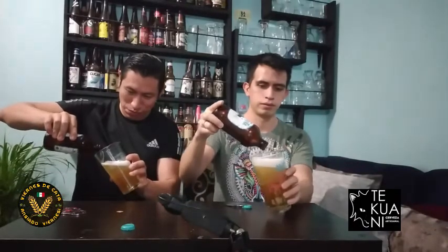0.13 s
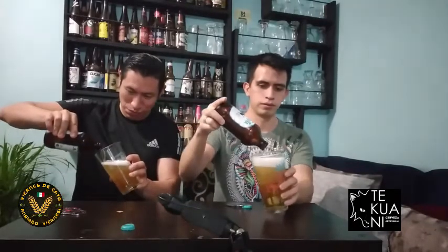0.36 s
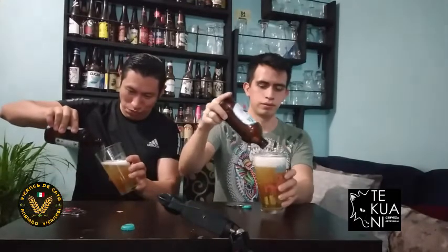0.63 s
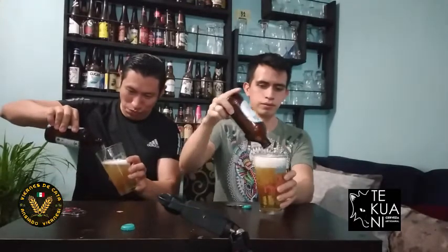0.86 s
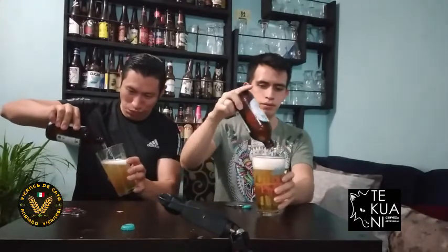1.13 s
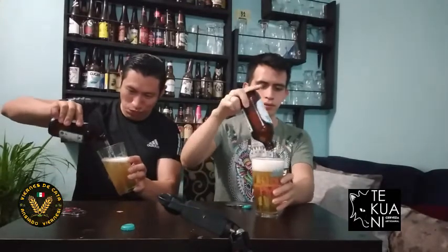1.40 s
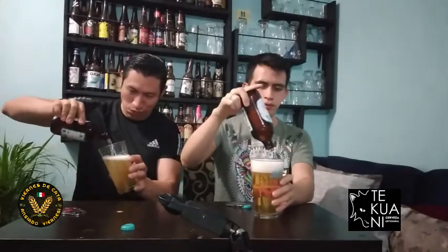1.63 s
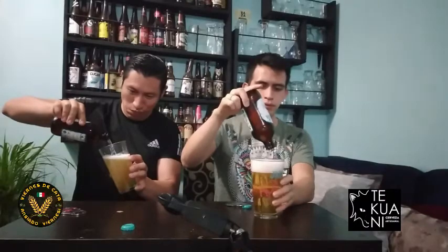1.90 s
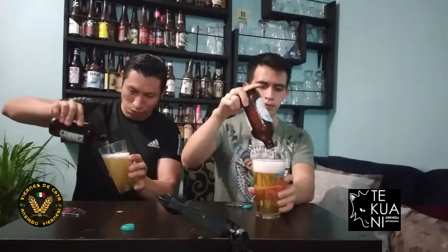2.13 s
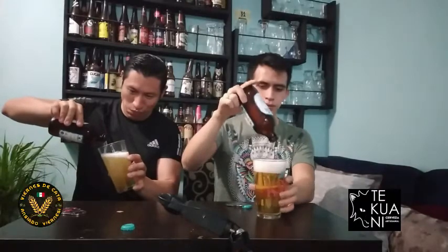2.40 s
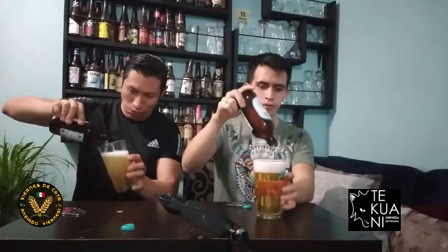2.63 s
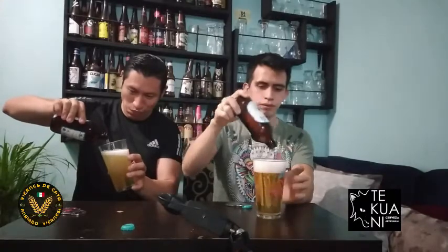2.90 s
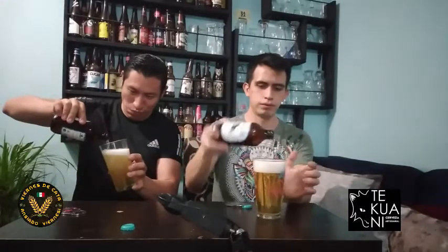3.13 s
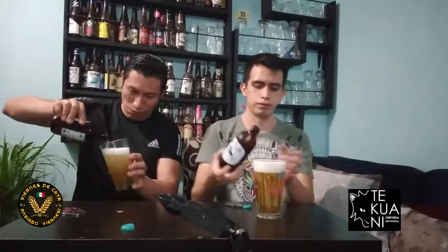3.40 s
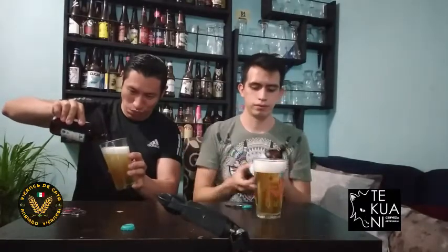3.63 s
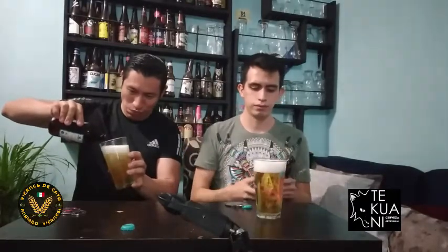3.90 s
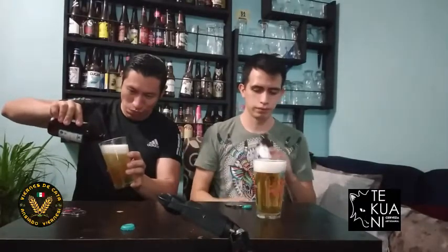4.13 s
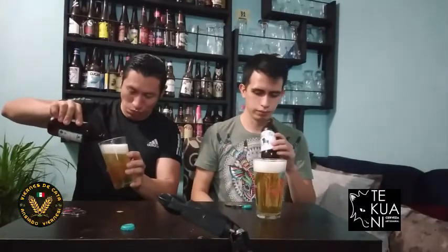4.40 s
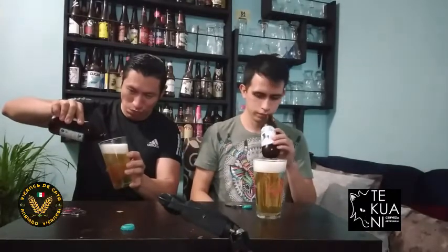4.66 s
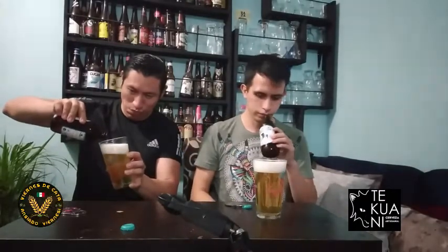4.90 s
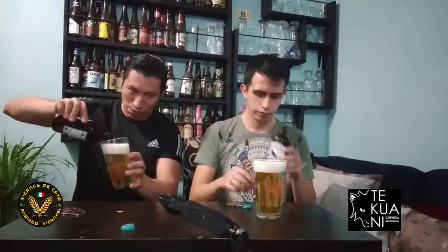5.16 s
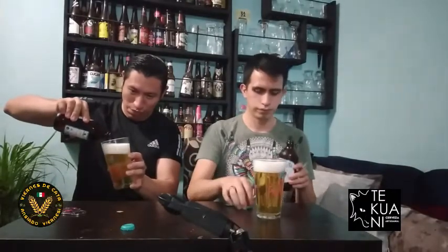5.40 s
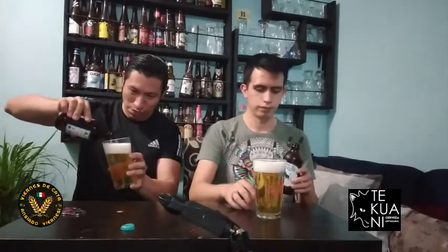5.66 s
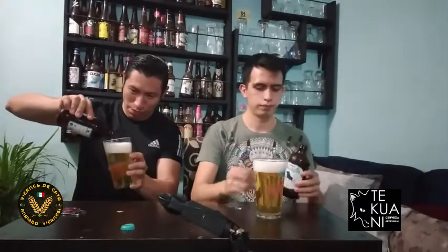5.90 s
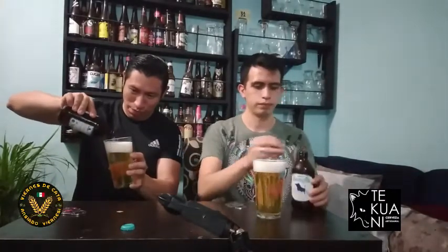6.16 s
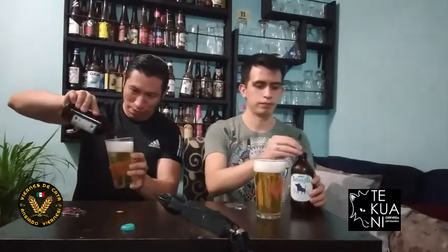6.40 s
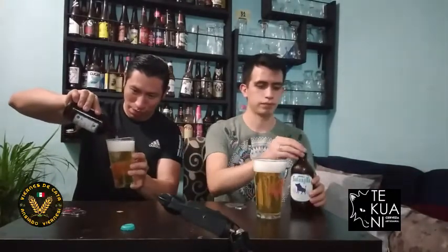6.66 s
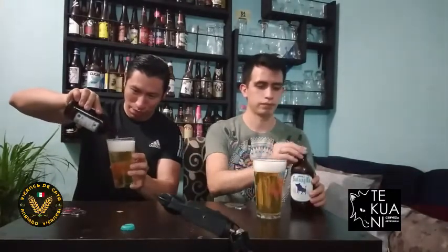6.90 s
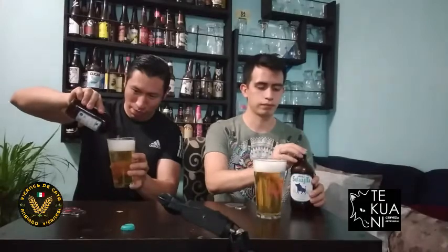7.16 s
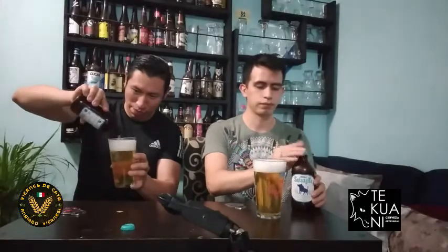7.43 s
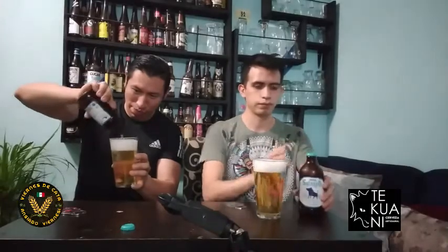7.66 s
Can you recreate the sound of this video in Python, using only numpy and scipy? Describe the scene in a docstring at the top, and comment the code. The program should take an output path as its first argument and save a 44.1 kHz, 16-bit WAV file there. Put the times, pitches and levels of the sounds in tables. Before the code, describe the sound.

Cooler hum and faint fading beer fizz over distant engine rumble, then bottles and glasses rub and knock on a wooden table with one loud clack.

```python
"""A small hard room, a microphone near a wooden table: a cooler hums, beer foam fizzes and fades away,
and far engines surge and rumble in the bass. Bottles are then rubbed, knocked and clinked, with small ticks;
something hard drops on the table with a loud clack, and more sliding, knocking and bottle ringing follow.
Noise makes hiss and rubs, struck decaying modes make wood and glass, sweeping sines make engines;
the microphone's noise suppressor lets the treble through only while something rises over the room."""
import sys
import numpy as np
from scipy import signal
from scipy.fft import rfft, irfft, next_fast_len
from scipy.io import wavfile
from scipy.ndimage import uniform_filter1d, minimum_filter1d

SR = 44100
rng = np.random.default_rng(int(sys.argv[2]) if len(sys.argv) > 2 else 0)


def bounce(signal):
    """Save signal as a 16-bit WAV file at the path given by the first command-line argument."""
    frames = np.transpose(np.atleast_2d(signal))
    limited = np.clip(frames, -1, 1)
    pcm = np.round(limited * 32767).astype(np.int16)
    wavfile.write(sys.argv[1], SR, pcm)


def voltage_ratio(decibels):
    """Convert decibels (scalar or array-like) to amplitude ratios, 20 dB per decade."""
    exponent = np.asarray(decibels, float) / 20
    return 10 ** exponent


N = 343646  # samples

# ringing modes of the wooden table top: mode_hz, level_db (relative), t60_s
TABLE_MODES = [(121, -9, 0.064), (195.2, -2.5, 0.1), (260, -6, 0.12), (303, -5, 0.29), (375, 3.5, 0.092),
               (430, 0.5, 0.16), (483.6, 2.5, 0.062), (541, -2.5, 0.08), (620, -3.5, 0.07),
               (730.7, -5, 0.22), (836, 0.5, 0.038), (990, 0.5, 0.037), (1107, -4.5, 0.057),
               (1490, 6.5, 0.0057)]


def rms_one(x):
    """Scale to rms 1."""
    return x / np.sqrt(np.mean(x ** 2) + 1e-20)


def at_hz(points, hz, axis=1):
    """Read a column of a table on a log-frequency axis."""
    points = np.array(points)
    return np.interp(np.log(hz + 1e-3), np.log(points[:, 0]), points[:, axis])


def in_time(rows):
    """Read a curve at every sample."""
    rows = np.array(rows)
    return np.interp(np.arange(N) / SR, rows[:, 0], rows[:, 1])


def shaped(x, gain):
    """Multiply the spectrum by gain(Hz)."""
    size = next_fast_len(x.shape[-1])
    hz = np.arange(size // 2 + 1) * SR / size
    return irfft(rfft(x, size) * gain(hz), size)[..., :x.shape[-1]]


def ring(clicks, hz, t60):
    """A two-pole resonator: a unit click sets a decaying sine of height 1 ringing."""
    radius = voltage_ratio(-60 / (t60 * SR))
    angle = 2 * np.pi * hz / SR
    return signal.lfilter([0, np.sin(angle)], [1, -2 * radius * np.cos(angle), radius ** 2], clicks + 1e-18)


def strike(times, level_db, modes, spread_db, colour_db=lambda hz: 0, reversed_share=0):
    """Every blow strikes every mode with a strength of its own; some modes start in the opposite direction."""
    at = np.round(np.asarray(times) * SR).astype(int)
    chance = rng.standard_normal((len(times), len(modes)))
    sign = np.where(rng.random(chance.shape) < reversed_share, -1, 1)
    out = np.zeros(N)
    for k, (hz, mode_db, t60) in enumerate(modes):
        strength_db = level_db + mode_db + colour_db(hz) + spread_db * chance[:, k]
        clicks = np.zeros(N)
        clicks[at] = sign[:, k] * voltage_ratio(strength_db)
        out += ring(clicks, hz, t60)
    return out


def snaps(times, level_db, t60):
    """Bursts of impulses with random signs, whose size decays smoothly from each start."""
    clicks = np.zeros(N)
    clicks[np.round(np.asarray(times) * SR).astype(int)] = voltage_ratio(level_db)
    decay = signal.lfilter([1], [1, -voltage_ratio(-60 / (t60 * SR))], clicks + 1e-18)
    return decay * rng.choice([-1, 1], N)


def ramps(start, length, attack, release):
    """0 to 1 after the start, back to 0 after the end (all in seconds)."""
    t = np.arange(N) / SR - start
    return np.clip(np.minimum(t / attack, 1 + (length - t) / release), 0, 1)


def stereo_noise(gain):
    """Coloured noise, most alike between the channels in the bass; the right one hears it a little later."""
    # sharing between the channels before the delay: frequency_hz, likeness (0 to 1)
    likeness = [(60, 0.75), (180, 1), (550, 0.12), (1650, 0.22), (4970, 0.23), (15000, 0.05)]

    def alike(hz):
        return np.clip(at_hz(likeness, hz), 0, 1)

    mid, side = rng.standard_normal((2, N))
    mid = shaped(mid, lambda hz: gain(hz) * np.sqrt((1 + alike(hz)) / 2))
    side = shaped(side, lambda hz: gain(hz) * np.sqrt((1 - alike(hz)) / 2))
    return np.array([mid + side, np.roll(mid - side, shift=20)])  # delay in samples


def traffic():
    """Far engine tones climb, swell and break off; a deep noise rumble swells with each heavy vehicle."""
    # engines pulling away: start_s, length_s, start_pitch_hz, end_level_db (rms)
    surges = [(0, 1.05, 57.7, -29), (1.191, 0.19, 63.3, -36.5), (1.811, 0.13, 67.8, -36),
              (2.023, 0.24, 63.2, -29), (2.602, 0.19, 86.1, -42), (2.992, 0.32, 80.9, -35),
              (3.391, 0.3, 83.4, -35), (3.845, 0.21, 88.1, -35.5), (4.143, 0.29, 86, -44.5)]
    # heavy vehicles: closest_pass_s, level_db (rms, added to the rumble at rest)
    passes = [(0, -31), (5.401, -48), (6.721, -33.5)]
    rest_db, rise_db_per_s, fall_db_per_s = -46, 60, 17.5
    climb_hz_per_s, swell_db_per_s = 7.5, 8.5
    attack_s, release_s = 0.038, 0.05

    t = np.arange(N) / SR
    level = voltage_ratio(rest_db)
    for pass_s, pass_db in passes:
        away_db = np.where(t < pass_s, rise_db_per_s * (pass_s - t), fall_db_per_s * (t - pass_s))
        level = level + voltage_ratio(pass_db - away_db)
    out = rms_one(stereo_noise(lambda hz: np.exp(-((hz - 30) / 9) ** 2))) * level

    for (start, length, hz, db), turn in zip(surges, rng.random(len(surges))):
        since = np.clip(t - start, -1, 2)
        tone = np.sin(2 * np.pi * (turn + hz * since + .5 * climb_hz_per_s * since ** 2))
        swell = voltage_ratio(db - swell_db_per_s * (length - since))
        # a surge at time zero is already under way
        gate = ramps(start, length, attack_s * (start > 0) + 1e-6, release_s)
        out += np.sqrt(2) * swell * gate * tone
    return out


def room_noise():
    """Broad air noise plus narrow noise bands where room modes hum."""
    # air noise ahead of the suppressor: frequency_hz, level_db (per third octave)
    air = [(20, -56), (40, -49.5), (100, -47.5), (200, -57), (320, -52), (450, -56.5), (650, -55.5),
           (900, -59), (1400, -67.5), (2500, -66), (4000, -68), (7000, -74), (12000, -82.5), (16000, -91)]
    # room modes excited by the cooler: centre_hz, width_hz, level_db (rms)
    hum = [(135.9, 11, -48), (174.2, 12, -46), (193.45, 5.2, -47), (243.9, 13, -43), (286.7, 11, -53),
           (324, 13, -59.5), (402, 18, -56)]
    third = 2 ** (1 / 6) - 2 ** (-1 / 6)  # third-octave width as a share of its centre

    def gain(hz):
        power = voltage_ratio(2 * at_hz(air, hz)) / (third * (hz + 1))
        for centre_hz, width_hz, level_db in hum:
            bell = np.exp(-.5 * ((hz - centre_hz) * 2 / width_hz) ** 2)
            power += voltage_ratio(2 * level_db) * bell / (width_hz * np.sqrt(np.pi / 2))
        return np.sqrt(power * SR / 2) * (hz > 12)

    return stereo_noise(gain)


def cooler():
    """The steady whine of the cooler's motor: a thin sine whose pitch wavers slowly and slightly."""
    pitch_hz, waver_hz, level_db = 414, 1.194, -50.5  # waver and level are rms
    waver = rms_one(shaped(rng.standard_normal(N), lambda hz: hz < 3))
    phase = 2 * np.pi * np.cumsum(pitch_hz + waver_hz * waver) / SR
    return np.sqrt(2) * voltage_ratio(level_db) * np.sin(phase)


def fizz():
    """Tiny foam bubbles burst in the glasses: bright noise of uneven grain, independent in each channel."""
    # fading of the foam: time_s, level_db (rms)
    foam = [(0, -62), (.4, -62.5), (1, -77), (4, -85.5)]
    bursts = rng.standard_normal((2, N)) * voltage_ratio(4.4 * rng.standard_normal((2, N)))
    band = signal.butter(1, [1300, 8000], "band", fs=SR, output="sos")
    return rms_one(signal.sosfilt(band, bursts)) * voltage_ratio(in_time(foam))


def stroke(start, length, db, change_db):
    """Pressure of one stroke: quick start, steady change in dB per s, quick stop, faint dying rustle."""
    attack_s, release_s = 0.0041, 0.0067
    settle_db, settle_db_per_s = -15, -93
    since = np.clip(np.arange(N) / SR - start, 0, None)
    moving = ramps(start, length, attack_s, release_s) * voltage_ratio(db + change_db * np.minimum(since, length))
    end_db = db + change_db * length
    settling = voltage_ratio(end_db + settle_db + settle_db_per_s * (since - length)) * (since > length)
    return np.maximum(moving, settling)


def rubs():
    """Dense tiny catches between two sliding surfaces come in clumps, coloured by what they shake."""
    # strokes grouped by the colour of the rub: start_s, length_s, start_level_db (rms), change_db_per_s
    strokes_by_colour = [
        [(1.594, 0.08, -48.5, -28), (6.848, 0.016, -49, -100)],
        [(5.423, 0.062, -47, 41), (5.476, 0.081, -42.5, -95), (5.545, 0.31, -47, -16),
         (5.615, 0.057, -46.5, 12)],
        [(1.672, 0.058, -49.5, -39), (6.203, 0.061, -34, -54), (6.25, 0.11, -32, -110),
         (6.388, 0.078, -48, -49)],
        [(6.953, 0.07, -46.5, -60)],
        [(7.058, 0.13, -38.5, -86)],
        [(7.47, 0.061, -55.5, 55), (7.525, 0.093, -47.5, 62), (7.605, 0.21, -36, -16.5)],
        [(5.481, 0.093, -47.5, -29.5)],
    ]
    # the colour of each group in the same order: frequency_hz, level_db (per Hz, relative)
    colours = [
        [(470, -42), (800, -11.5), (992, -12), (1460, -14), (3620, -17.5), (14000, -47.5)],
        [(470, -34.5), (760, -5.5), (1160, -10.5), (2160, -14.5), (3570, -9.5), (4880, -23.5), (8500, -28.5),
         (14000, -42)],
        [(470, -32), (800, 0), (1350, -18.5), (2590, -12.5), (3290, -26.5), (11200, -40.5), (14000, -67)],
        [(470, -39), (800, -10), (981, -14.5), (2500, -13), (5570, -32), (7420, -13), (8470, -26), (11200, -26),
         (14000, -39)],
        [(470, -31), (800, -10.5), (1720, -11), (1990, -15), (3750, -15), (5370, -20.5), (7510, -14.5),
         (14000, -31)],
        [(470, -28), (800, -5), (902, -20), (1160, -1), (1560, -7.5), (2210, -5.5), (3170, -18), (11200, -30),
         (14000, -47)],
        [(2500, -22.5), (3500, -1), (4600, -21), (7900, -42.5), (8600, -8), (9500, -43.5)],
    ]
    out = np.zeros((2, N))
    clumps = rms_one(shaped(rng.standard_normal(N), lambda hz: (hz > 20) & (hz < 150)))
    for strokes, colour in zip(strokes_by_colour, colours):
        unevenness_db = 3.1 * rng.standard_normal(N) + 1.8 * clumps
        catches = rng.standard_normal((3, N)) * voltage_ratio(unevenness_db)
        sides = .6 * catches[0] + .8 * catches[1:]  # partly shared by left and right
        coloured = rms_one(shaped(sides, lambda hz: voltage_ratio(at_hz(colour, hz))))
        out += coloured * np.max([stroke(*row) for row in strokes], axis=0)
    return out


def knocks():
    """The table top rings dully after a contact of about a millisecond, strongest near the pitch of the spot."""
    # glass touching the table: start_s, level_db (relative), spot_pitch_hz (favoured by the spot)
    touches = [(1.6, -13, 206), (1.63, -19.5, 283), (1.657, -20, 240), (5.428, -20.5, 346.6),
               (5.487, -24, 487), (5.548, -27, 279.5), (6.206, -10, 460), (6.257, -13, 379),
               (6.292, -17, 375), (6.393, -15.5, 430), (6.849, -28.5, 500), (6.966, -24, 300),
               (7.064, -13, 385), (7.154, -25.5, 417), (7.486, -26, 365), (7.525, -22, 430),
               (7.564, -19.5, 515), (7.609, -14.5, 396), (7.62, -17, 420), (7.64, -21, 430),
               (7.672, -16.5, 450), (7.696, -16, 470), (7.744, -20, 423)]
    bounce_s, bounce_loss_db, bounce_pitch = 0.025, 7.5, 0.63  # typical delay, loss, pitch ratio
    knock_tilt_db, bounce_tilt_db = 7, -2  # per octave
    s, level_db, spot_hz = np.transpose(touches)
    tilt_db = np.repeat([knock_tilt_db, bounce_tilt_db], len(s))

    # each knock lands once more, softer and lower
    s = np.append(s, s + bounce_s * voltage_ratio(1.5 * rng.standard_normal(len(s))))
    level_db = np.append(level_db, level_db - bounce_loss_db)
    spot_hz = np.append(spot_hz, spot_hz * bounce_pitch)

    def colour_db(hz):
        octaves = np.log2(hz / spot_hz)
        return tilt_db * octaves - 16.5 * np.abs(octaves)

    wood = strike(s, level_db - 7.5, TABLE_MODES, spread_db=2.5, colour_db=colour_db, reversed_share=.5)
    contact = np.hanning(round(0.00078 * SR))  # contact length in s
    snap = signal.lfilter([.4], [1, -.6], snaps(s, level_db - 37.5, t60=0.0098))
    return signal.lfilter(contact / contact.sum(), [1], wood) + snap


def clinks_and_ticks():
    """Glass on glass rings faintly in decaying modes; ticks and rustles are tiny snaps around one pitch."""
    # glass on glass: start_s, level_db (relative)
    touches = [(3.541, -47), (3.555, -46)]
    # ringing modes of the glass: mode_hz, level_db (relative), t60_s
    glass = [(3350, -10, 0.047), (3742, -0.5, 0.045), (4776, -9.5, 0.04), (8110, -8.5, 0.032),
             (10290, -12, 0.048)]
    # small ticks and rustles: start_s, level_db (before band-pass), pitch_hz, t60_s
    ticks = [(2.543, -46.5, 4800, 0.15), (3.255, -38.5, 8500, 0.031), (7.061, -37.5, 5990, .03),
             (7.606, -32, 7500, .025)]
    s, level_db = np.transpose(touches)
    out = strike(s, level_db, glass, spread_db=1.5)
    for s, level_db, hz, t60 in ticks:
        band = signal.butter(1, [hz / 0.89, hz * 1.2], "band", fs=SR, output="sos")
        out += signal.sosfilt(band, snaps([s], level_db, t60))
    return out


def clacks(which):
    """Push-and-pull pulses with the colour of the dropped hard thing, and the table ringing under them."""
    # spectrum of the hard thing: frequency_hz, level_db (per Hz, relative)
    hard_thing = [(150, -44.5), (300, -18), (440, -10), (579, -4.5), (664, 0.5), (800, -14), (3000, -11.5),
                  (4840, -19), (7000, -16), (11500, -20.5), (15000, -35)]
    s, level_db = np.transpose(which)
    clicks = np.zeros(N)
    clicks[np.round(s * SR).astype(int)] = voltage_ratio(level_db + 24.5)
    # a quarter turn of phase makes each pulse push, then pull
    crack = shaped(clicks, lambda hz: -1j * voltage_ratio(at_hz(hard_thing, hz)))
    begun = np.arange(N) > (s[0] - .0004) * SR
    table = strike(s, level_db - 26.5, TABLE_MODES, spread_db=6.0,
                   colour_db=lambda hz: -7.0 * np.abs(np.log2(hz / 450)))
    return crack * begun + table


def bottle():
    """The bottle wall rings in decaying modes as it is dragged and set down."""
    # contacts of the bottle: start_s, level_db (relative)
    bumps = [(6.252, -37.5), (7.58, -37), (7.608, -24.5), (7.669, -44.5)]
    # ringing modes of its wall: mode_hz, level_db (relative), t60_s
    wall = [(1147, 1, 0.11), (1840, -19, 0.074), (2156, -14.5, 0.11), (2490, -9, 0.062)]
    s, level_db = np.transpose(bumps)
    return strike(s, level_db, wall, spread_db=3.0)


def room(x):
    """Dense echoes: octave bands of noise die at their own rates, less alike in both channels in the treble."""
    # dying of the echoes: frequency_hz, t60_s
    reverb_t60 = [(200, 0.36), (1000, 0.38), (4000, 0.4), (12000, 0.29)]
    t, echo = np.arange(SR // 2) / SR, 0
    for hz in 125 * 2. ** np.arange(8):
        band = signal.butter(2, [hz / 1.42, min(hz * 1.42, 20000)], "band", fs=SR, output="sos")
        decay = voltage_ratio(-60 * t / at_hz(reverb_t60, hz))
        mid, side = signal.sosfilt(band, rng.standard_normal((2, len(t)))) * decay
        alike = 1 / (1 + hz / 2500)
        echo = echo + np.sqrt(1 + alike) * mid + np.sqrt(1 - alike) * side * [[1], [-1]]
    echo = echo * np.clip(t / 0.0019, 0, 1)  # the echoes build up over about 2 ms
    echo = echo / np.sqrt(np.sum(echo ** 2) / 2)
    return signal.fftconvolve(x[None], echo, axes=1)[:, :N]


def dull(x, cut_hz):
    """A gentle low-pass: reflections lose treble."""
    return signal.lfilter(*signal.butter(1, cut_hz, fs=SR), x)


def scene():
    """All sources at their distances; blows, clinks and ticks also sound in the room."""
    # a hard thing dropped on the table, then two echoes from things close by: start_s, level_db (relative)
    drop_and_echoes = [(5.6668, 0.5), (5.669, 1), (5.6726, -7.5)]
    background = traffic() + room_noise() + cooler() + fizz()
    soft = knocks() + bottle()
    thuds = soft + room(soft)
    faint = clinks_and_ticks()
    small_sounds = faint + voltage_ratio(-14.5) * room(faint)
    hard, near_echoes = clacks(drop_and_echoes[:1]), clacks(drop_and_echoes[1:])
    clack = hard + dull(near_echoes, cut_hz=4100) + voltage_ratio(7.0) * room(dull(hard, cut_hz=6000))
    return background + rubs() + thuds + small_sounds + clack


def held(db, hold_s):
    """The highest value of the last moments."""
    hold = max(round(hold_s * SR), 3)
    return -minimum_filter1d(-db, hold, origin=(hold - 1) // 2)


def suppress(x):
    """Noise suppressor: a band is cut unless the sound in it or above it rises over its usual level."""
    # treble bands: lower_edge_hz, cut_db (when shut), opening_db (over the usual level)
    bands = [(500, 1, 8.5), (873, 11, 3), (1540, 12, 7.5), (2600, 14.5, 8)]
    hold_s = 0.0098  # a band stays open this long after the sound sinks
    # a sound this far over the top band's threshold holds the lower bands open longer
    loud_opening_db, low_bands_hold_s = 3, 0.056
    size = round(0.0077 * SR)  # level averaging time in s

    above = [shaped(x, lambda hz: 1 / (1 + (edge_hz / (hz + 1)) ** 8)) for edge_hz, _, _ in bands]
    above.append(0 * x)
    parts = [above[k] - above[k + 1] for k in range(len(bands))]
    out = x - above[0]  # the bass always passes
    excess = []
    for part, (_, _, opening_db) in zip(parts, bands):
        power = uniform_filter1d(np.mean(part ** 2, axis=0), size, origin=(size - 1) // 2)
        level_db = 10 * np.log10(np.abs(power) + 1e-14)
        excess.append(level_db - np.median(level_db) - opening_db)

    for k, (_, cut_db, _) in enumerate(bands):
        heard_db = held(np.max(excess[k:], axis=0), hold_s)
        if k < len(bands) - 1:
            heard_db = np.maximum(heard_db, held(excess[-1] - loud_opening_db, low_bands_hold_s))
        shut = .5 - .5 * np.tanh(2 * heard_db)
        out += parts[k] * voltage_ratio(-cut_db * shut)
    return out


def capsules(x):
    """Two microphone capsules in their case: shared treble colour, roll-off, and level and phase differences."""
    # treble colour of capsule and case: frequency_hz, level_db
    colour = [(2500, 0), (7200, -0.5), (9300, -7.5), (11300, -1.5), (14000, -5.5)]
    # how the two capsules differ: frequency_hz, left_minus_right_db, left_lead_radians
    pair = [(59.8, -1, 0), (1300, 0.5, -1.62), (2430, 0.5, -1.35), (4500, 1.5, 0.64), (7110, 10, 1.5),
            (8050, 9, 0), (10000, -7.5, 1.5), (11100, -11, 1.5), (15000, -5, 5.5)]
    half = np.array([[.5], [-.5]])  # each side takes half of the difference

    def response(hz):
        level = voltage_ratio(at_hz(colour, hz) + half * at_hz(pair, hz))
        return level * np.exp(1j * half * at_hz(pair, hz, axis=2))

    roll_off = signal.butter(4, 14500, fs=SR, output="sos")
    return shaped(signal.sosfilt(roll_off, x), response)


def top_cut(x):
    """Nothing passes above the cut-off."""
    return signal.sosfilt(signal.butter(12, 15760, fs=SR, output="sos"), x)


def record(dry):
    """Microphone capsules, noise suppressor, amplifier hiss, clipped peaks and band limit."""
    run = 4000  # samples of mirrored sound at both ends, so that the filters have settled
    padded = np.pad(dry, ((0, 0), (run, run)), mode="reflect", reflect_type="odd")
    amplified = suppress(capsules(padded))[:, run:-run]
    hiss = voltage_ratio(-80.5) * rng.standard_normal(dry.shape)
    clipped = np.clip(amplified + hiss, -.98, .98)
    band_limit = signal.cheby2(10, 50, 16200, fs=SR, output="sos")
    return top_cut(signal.sosfilt(band_limit, clipped))


dry = scene()
out = record(dry)
bounce(out)
```